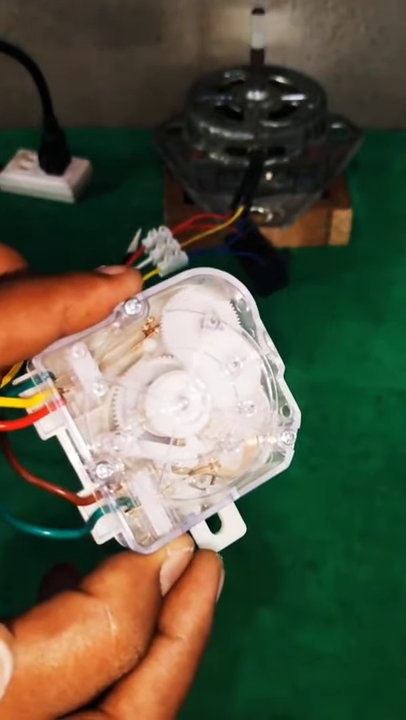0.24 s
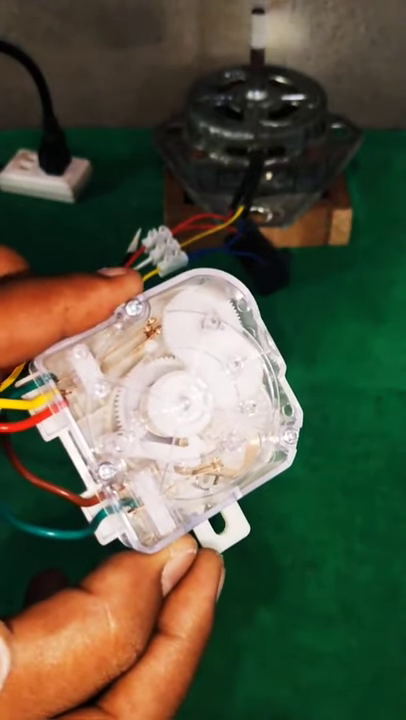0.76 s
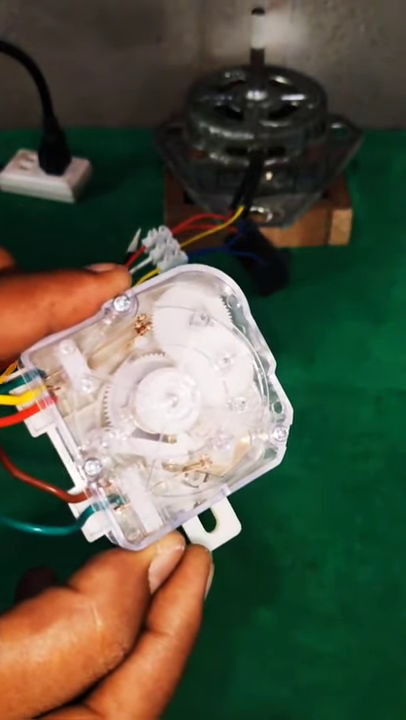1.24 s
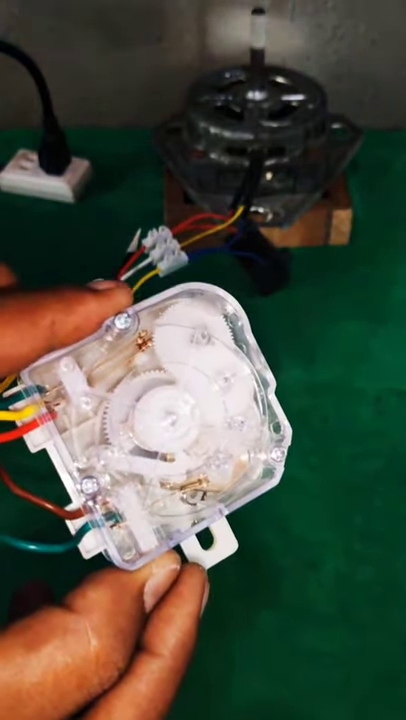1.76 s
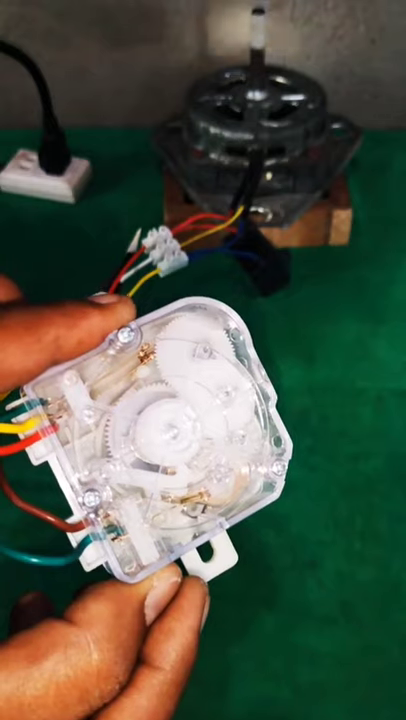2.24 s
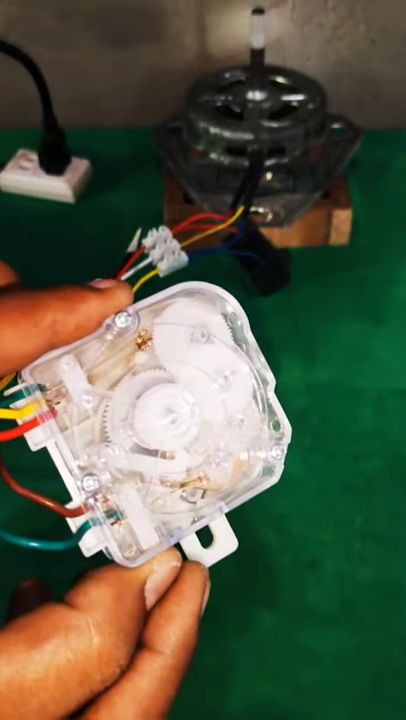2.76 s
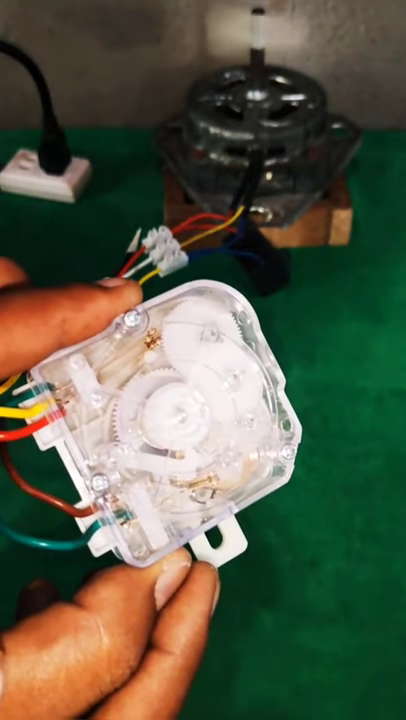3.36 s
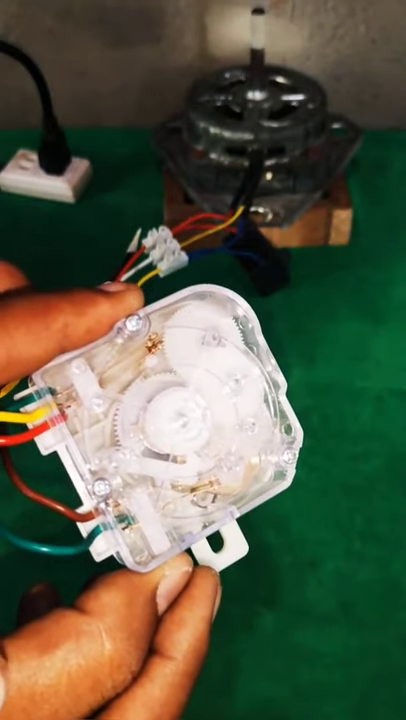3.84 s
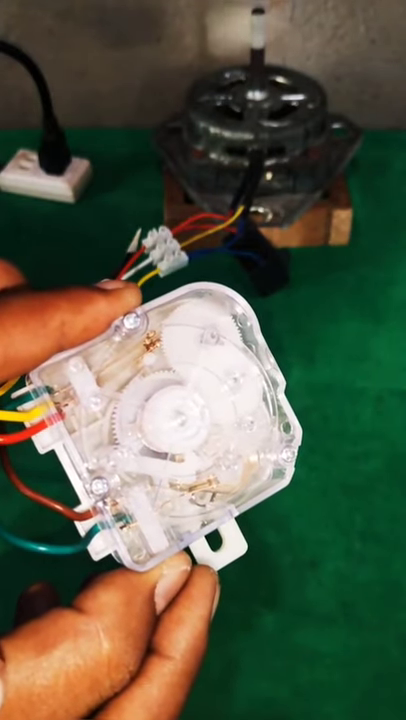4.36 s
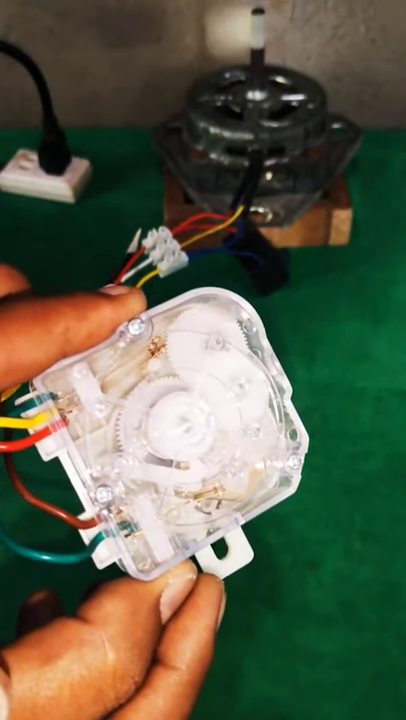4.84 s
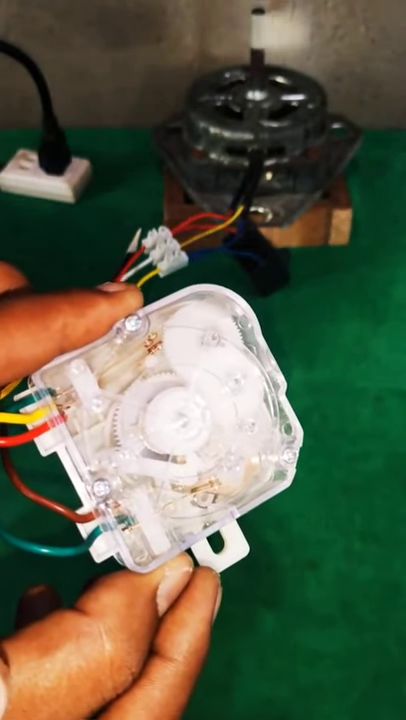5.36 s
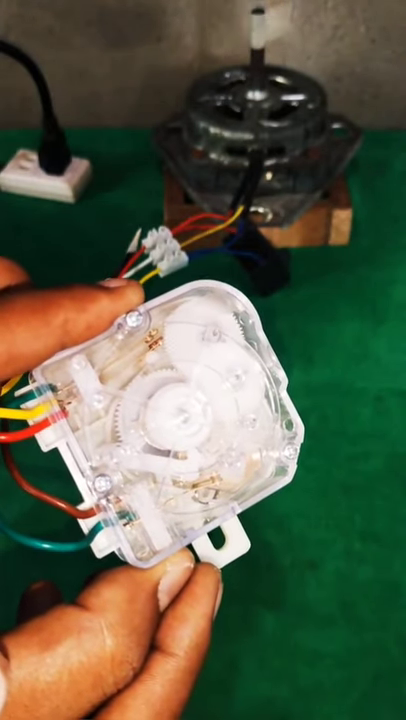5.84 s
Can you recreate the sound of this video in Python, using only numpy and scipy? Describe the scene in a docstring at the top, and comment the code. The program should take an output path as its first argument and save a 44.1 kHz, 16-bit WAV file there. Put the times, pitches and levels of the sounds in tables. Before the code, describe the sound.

A bare electric motor hums loudly with a periodic loose knocking, then the power cuts and it coasts with rattling bursts on its block.

```python
"""A bare washing-machine induction motor runs on a wooden block on a bench: mains hum, rolling bearings,
and a loose knock once per turn that comes and goes with the slow beat between rotor and field.
A clockwork timer ticks throughout; it cuts the power at 4.826 s and the hum stops within a fraction of a second.
The motor then coasts, rocking and rattling on its block in short bursts while the bench drones.
Hum, whirr and drone are sines, rolling and air shaped noise, knocks and ticks clicks ringing modes."""
import sys
import numpy as np
from scipy import signal
from scipy.fft import rfft, irfft, next_fast_len
from scipy.io import wavfile
from scipy.ndimage import map_coordinates

SR = 44100
rng = np.random.default_rng(int(sys.argv[2]) if len(sys.argv) > 2 else 0)


def file_out(sig):
    """Save sig as 16-bit WAV at sys.argv[1]."""
    # one column per channel
    cols = np.atleast_2d(sig).T
    # limit, then scale
    lim = np.clip(cols, -1, 1)
    pcm = np.round(lim * 32767).astype(np.int16)
    wavfile.write(sys.argv[1], SR, pcm)


N = 268524
TIME = np.arange(N) / SR

MAINS_HZ, SHAFT_HZ = 59.895, 29.377
POWER_OFF_S = 4.826
BEAT_S, BEAT_PEAK_S = 0.4345, 0.17   # beat between rotor and field; a moment of greatest load
KNOCK_AT_S = 0.166   # first hard knock
ROCK_HZ = 206.7   # bounce rate on the block
KNOCK_ROOM_T60_S = 0.15

# rolling of the coasting motor: t/s, level/dB re powered run
COAST = [(4.84, 1), (4.92, -8.5), (5.02, -11), (5.36, -12), (5.5, -5), (5.8, -8), (6.09, -6)]
# bursts of rocking while coasting: start/s, length/s, rattle peak/dB, swell rms/dB (nominal levels)
BURSTS = [(4.875, .012, -48, -42), (4.968, .008, -38, -39), (5.066, 0.0035, -38, -39.5),
          (5.124, 0.029, -33, -36.5), (5.408, 0.015, -40.5, -42.5), (5.439, .004, -38, -46),
          (5.4567, 0.0094, -30.5, -38), (5.509, 0.02, -33.5, -40.5), (5.559, 0.021, -31.5, -36),
          (5.623, 0.0035, -31.5, -45), (5.663, 0.022, -29.5, -36), (5.713, .004, -38.5, -42),
          (5.7342, .008, -30.5, -48), (5.856, .028, -35.5, -42), (5.924, 0.026, -34, -38),
          (5.988, 0.019, -31.5, -44), (6.078, 0.01, -33.5, -40)]


def from_db(db):
    """Decibels to gain."""
    return 10 ** (np.asarray(db) / 20)


def rms_one(x):
    """Scale to unit rms."""
    return x / np.sqrt(np.mean(x ** 2) + 1e-20)


def in_time(rows):
    """Each column of a curve, interpolated at every sample."""
    s, *columns = np.transpose(rows)
    return [np.interp(TIME, s, c) for c in columns]


def coloured(x, spectrum):
    """Shape a signal by gains (f/Hz, level/dB), falling 20 dB per octave outside them; rms 1."""
    hz, db = np.transpose(spectrum)
    size = next_fast_len(N + SR // 4)
    bins_hz = np.maximum(np.arange(size // 2 + 1) * SR / size, 1)
    outside_octaves = np.abs(np.log2(bins_hz / np.clip(bins_hz, hz[0], hz[-1])))
    gain = from_db(np.interp(np.log(bins_hz), np.log(hz), db) - 20 * outside_octaves)
    return rms_one(irfft(rfft(x, size) * gain, size)[:N])


def drift(rate_hz):
    """Slow chance: straight lines between random knots of spread 1."""
    knots = rng.standard_normal(1024)
    return np.interp(TIME * rate_hz, np.arange(len(knots)), knots)


def decay(t_s, t60_s):
    """Exponential fall of 60 dB in t60."""
    return np.exp(-np.log(1000) * t_s / t60_s)


def ring(clicks, hz, t60_s):
    """A two-pole resonator: a unit click starts a decaying sine of height 1."""
    r, w = decay(1 / SR, t60_s), 2 * np.pi * hz / SR
    return signal.lfilter([0, np.sin(w)], [1, -2 * r * np.cos(w), r * r], clicks + 1e-18)


def click_train(rows):
    """One click per row (t/s, level/dB)."""
    s, db = np.transpose(rows)
    clicks = np.zeros(N)
    clicks[np.clip((s * SR).astype(int), 0, N - 1)] = from_db(db)
    return clicks


def strikes(rows, modes, scatter_db):
    """Each contact (t/s, level/dB) rings every mode (f/Hz, level/dB, t60/s) with a strength of its own."""
    hz, db, t60_s = np.transpose(modes)[:, :, None]
    t = TIME[:SR // 10]
    signs = (-1) ** np.arange(len(modes))[:, None]
    rings = signs * from_db(db) * decay(t, t60_s) * np.sin(2 * np.pi * hz * t)
    hits = from_db(scatter_db * rng.standard_normal((len(rows), len(modes)))) @ rings
    out = np.zeros(N + SR)
    for (s, level_db), hit in zip(rows, hits):
        start = max(int(s * SR), 0)
        out[start:start + len(t)] += from_db(level_db) * hit
    return out[:N]


def contact(clicks, edge_hz):
    """A blunt contact pushes for a fraction of a millisecond, which dulls the click: a low-pass."""
    return signal.sosfilt(signal.butter(2, min(edge_hz, 0.45 * SR), fs=SR, output="sos"), clicks)


def room(x, wet_db, t60_s):
    """Dense reflections of a small workshop, a decaying noise tail, follow the direct sound."""
    t = TIME[:SR // 2]
    tail = rng.standard_normal(len(t)) * decay(t, t60_s) * (t > 0.004)
    tail = tail / np.sqrt(np.sum(tail ** 2))
    return x + from_db(wet_db) * signal.fftconvolve(x, tail)[:N]


def rotor_time(spin_down_s):
    """Seconds of full-speed turning done so far; friction slows the rotor once the power is off."""
    speed = np.exp(-np.maximum(TIME - POWER_OFF_S, 0) / spin_down_s)
    return np.cumsum(speed) / SR


def power(fade_s):
    """One while the current flows, then an exponential decay."""
    return np.exp(-np.maximum(TIME - POWER_OFF_S, 0) / fade_s)


def rolling_force(turned_s, fresh, grain_db, throb, throb_at_s):
    """Rolling grain repeats with every beat, plus fresh noise; the load swings once per turn."""
    count = int(BEAT_S * SR)
    pits = rng.standard_normal(count) * from_db(grain_db * drift(400)[:count])
    repeating = map_coordinates(rms_one(pits), [turned_s * SR % count], order=3, mode="wrap")
    load = 1 + throb * np.cos(2 * np.pi * SHAFT_HZ * (turned_s - throb_at_s))
    return (repeating + fresh * rng.standard_normal(N)) * load


def room_air():
    """Steady noise of the room air."""
    # spectrum: f/Hz, density/dB (relative)
    spectrum = [(30, 14), (120, 27), (250, 28.5), (500, 20.5), (1500, 9), (4000, 3.5), (7000, -2),
                (13000, -2.5), (15000, -6), (16000, 0.5)]
    return from_db(-65.0) * coloured(rng.standard_normal(N), spectrum)


def snaps(t60_s):
    """A few crisp snaps of decaying band-passed noise, the last ones as the power is cut."""
    # snaps: t/s, click height/dB (before filtering)
    snap_rows = [(0.167, -41), (4.811, -51), (4.840, -53)]
    t = TIME[:SR // 20]
    crack = rng.standard_normal(len(t)) * decay(t, t60_s)
    crack = signal.sosfilt(signal.butter(2, [2200, 7000], "band", fs=SR, output="sos"), crack)
    return contact(np.convolve(click_train(snap_rows), crack)[:N], edge_hz=3400)


def timer(tick_db, tock_db):
    """The clockwork escapement ticks fast and a little unevenly, tick stronger than tock, in its case."""
    # modes of the plastic case: f/Hz, level/dB, t60/s
    case_modes = [(3200, -6, 0.0078), (3095, -1, 0.013), (3530, -8.5, 0.019), (4070, -12, 0.024),
                  (4580, -17.5, 0.014), (5360, -24.5, 0.007)]
    ticks_per_s = 36.4
    index = np.arange(int(N / SR * ticks_per_s))
    s = (index + 0.5 + 0.05 * rng.standard_normal(len(index))) / ticks_per_s
    rows = np.column_stack([s, tick_db + tock_db * (index % 2)])
    case = strikes(rows, case_modes, scatter_db=5.5)
    return room(contact(case, edge_hz=5500), wet_db=-6.0, t60_s=0.032)


def bench(turned_s):
    """The bench top rumbles under power, thuds now and then and drones during the coast."""
    # rumble spectrum: f/Hz, density/dB (relative)
    rumble_spectrum = [(20, -27), (40, -17), (55, -8), (68, 1.5), (84, -1.5), (100, -8.5), (130, -10.5),
                       (180, -38)]
    # drone under the coasting motor: t/s, f/Hz, rms/dB (before its drift)
    drone_curve = [(4.8, 69.3, -69.5), (4.86, 68.5, -39), (4.94, 72.6, -59), (5.45, 76.35, -55),
                   (5.54, 77.6, -43.5), (5.68, 83, -48), (5.735, 80, -34), (5.79, 77.5, -51),
                   (6.09, 72.4, -48.5)]
    # thuds: t/s, f/Hz, peak/dB (before the high-pass)
    thud_rows = [(0.179, 80.3, -24.5), (1.59, 77, -27.5), (2.02, 79, -34.5), (3.878, 78.3, -27.5),
                 (4.811, 79.5, -30), (5.11, 137, -39)]
    force = rolling_force(turned_s, fresh=1.1, grain_db=1.0, throb=0.091, throb_at_s=0.034)
    rumble = from_db(-43.5) * coloured(force, rumble_spectrum) * power(fade_s=0.065)
    hz, db = in_time(drone_curve)
    drone = np.sqrt(2) * from_db(db + 1.5 * drift(25)) * np.sin(2 * np.pi * np.cumsum(hz) / SR)
    thuds = sum(ring(click_train([(s, peak_db)]), pitch_hz, t60_s=0.3)
                for s, pitch_hz, peak_db in thud_rows)
    thuds = signal.sosfilt(signal.butter(2, 50, "high", fs=SR, output="sos"), thuds)
    return rumble + drone + thuds


def rotor_tones(turned_s, waver_db):
    """The rotor's tones swell in turn through each beat, so the whirr seems to wander up and down."""
    # tones: f/Hz at full speed, rms/dB mid-swell, swell peak/s after the greatest load
    tone_rows = [(324.4, -61, 0.2), (386, -65, 0.023), (565, -61, .161), (591, -63.5, 0.052),
                 (657.5, -61, .366), (712.6, -62.5, 0.03), (764.2, -63.5, 0.2), (1233, -63, 0.028)]
    depth_db = 5
    tones = 0
    for hz, db, swell_s in tone_rows:
        swell_db = depth_db * np.cos(2 * np.pi * (turned_s - BEAT_PEAK_S - swell_s) / BEAT_S)
        gain = from_db(db + swell_db + waver_db * drift(4.8))
        tones = tones + gain * np.sin(2 * np.pi * (hz * turned_s + rng.random()))
    return np.sqrt(2) * tones * power(fade_s=0.063)


def bearing_load(turned_s, wander_db):
    """Bearing load in dB: it swells as the rotor slips past the poles and jumps at the first hard knock."""
    # load swing: multiple of the beat rate, swing/dB
    swings = [(1, 0.44), (2, 0.53), (4, 0.72)]
    jolt_db, settle_s = 3, 0.11
    beat_phase = 2 * np.pi * (turned_s - BEAT_PEAK_S) / BEAT_S
    swing_db = sum(db * np.cos(k * beat_phase) for k, db in swings)
    since_knock_s = TIME - KNOCK_AT_S
    jolt = jolt_db * np.exp(-np.abs(since_knock_s) / settle_s) * (since_knock_s > 0)
    return (swing_db + jolt + wander_db * drift(8.3)) * power(fade_s=0.03)


def bearings(turned_s):
    """Rolling shakes the frame, rings the end shield and hisses in the races."""
    # spectrum of the frame: f/Hz, density/dB (relative)
    frame_spectrum = [(110, -12), (150, 3.5), (200, -7.5), (300, 1), (370, -10.5), (490, -11), (580, -4.5),
                      (760, -2.5), (880, -10.5), (960, -2), (1030, -12.5), (1300, -10), (1500, -26.5)]
    # spectrum of the end shield: f/Hz, density/dB (relative)
    shield_spectrum = [(950, -31), (1060, -6), (1130, 5), (1220, 3), (1320, -9.5), (1450, -14.5),
                       (1650, -4.5), (1900, -13.5), (2300, -15.5), (2600, -26.5), (3200, -54)]
    # spectrum of the races: f/Hz, density/dB (relative)
    race_spectrum = [(1300, -20.5), (1700, 1), (2300, -1), (2530, -10.5), (2700, -2.5), (2900, -6.5),
                     (3080, -0.5), (3300, -16.5), (3900, -19), (4500, -25), (5200, -33.5), (9000, -40.5),
                     (12000, -50.5)]
    # narrow ring of the races, pulsing with each turn: f/Hz, density/dB (relative)
    ring_spectrum = [(2450, -29.5), (2630, -7), (2702, 2.5), (2790, -5.5), (2950, -28)]
    coast_db, = in_time(COAST)
    load_db = bearing_load(turned_s, wander_db=0.1)

    force = rolling_force(turned_s, fresh=0.32, grain_db=1.5, throb=0.26, throb_at_s=0.03)
    frame = from_db(-48 + 0.5 * load_db) * coloured(force, frame_spectrum)

    # the end shield answers load more steeply than the frame
    force = rolling_force(turned_s, fresh=0.6, grain_db=1.5, throb=0.31, throb_at_s=0.03)
    shield = from_db(-51 + 1.9 * load_db) * coloured(force, shield_spectrum)

    force = rolling_force(turned_s, fresh=1.0, grain_db=3.0, throb=0.2, throb_at_s=0.029)
    races = from_db(-57.0 + 0.8 * coast_db + 0.85 * load_db) * coloured(force, race_spectrum)

    force = rolling_force(turned_s, fresh=0.99, grain_db=0.5, throb=0.92, throb_at_s=0.02)
    race_ring = from_db(-65.5 + 1.3 * coast_db) * coloured(force, ring_spectrum)
    return (frame + shield) * from_db(coast_db) + races + race_ring


def hum(waver_db):
    """The field squeezes the stator twice per mains cycle: wavering sines at multiples of that rate."""
    # harmonics: multiple of twice the mains frequency, rms/dB (before the waver)
    harmonics = [(1, -26.5), (2, -48), (3, -58.5), (5, -61), (6, -63), (7, -58), (8, -66.5), (9, -71),
                 (10, -62.5)]
    tones = 0
    for k, db in harmonics:
        gain = from_db(db + waver_db * np.sqrt(k) * drift(9))
        tones = tones + gain * np.sin(2 * np.pi * (2 * k * MAINS_HZ * TIME + rng.random()))
    return np.sqrt(2) * tones * power(fade_s=0.023)


def spell(from_peak_s):
    """Strength 0 to 1 of a knocking spell: builds over a few turns, breaks off, returns every beat."""
    rise_s, fall_s = 0.06, 0.028
    off_s = (from_peak_s + BEAT_S / 2) % BEAT_S - BEAT_S / 2
    return np.exp(-(off_s / np.where(off_s < 0, rise_s, fall_s)) ** 2)


def turn_knocks(scatter_db, stray_s):
    """Rows (t/s, level/dB): a knock per powered turn, strong and weak spell per beat; hard ones replace."""
    # turns on which the rotor knocks hard: t/s, level/dB
    hard_knocks = [(.166, -24.5), (0.1981, -31), (.8073, -32.5), (1.016, -32.5), (1.05, -27.5),
                   (1.4588, -30), (2.3435, -26), (2.7524, -30.5), (2.7871, -31), (2.9866, -30.5),
                   (3.6384, -30), (4.5232, -29.5), (4.840, -30.5)]
    spell_db, half_spell_db, lull_db = -34.5, -43, -51   # beat peak, half-way between peaks, lulls
    s = np.arange(KNOCK_AT_S % (1 / SHAFT_HZ), POWER_OFF_S, 1 / SHAFT_HZ)
    strong = from_db(spell_db) * spell(s - BEAT_PEAK_S)
    weak = from_db(half_spell_db) * spell(s - BEAT_PEAK_S - BEAT_S / 2)
    db = 20 * np.log10(strong + weak + from_db(lull_db))
    rows = np.column_stack([s, db]) + rng.standard_normal((len(s), 2)) * [stray_s, scatter_db]
    nearest_hard_s = np.abs(s[:, None] - np.array(hard_knocks)[:, 0]).min(axis=1)
    return np.vstack([rows[nearest_hard_s > 0.5 / SHAFT_HZ], hard_knocks])


def rocking(rough, waver_rad):
    """The coasting motor bounces unevenly on its feet, one swell per burst, over a low wobble."""
    # wobble spectrum: f/Hz, density/dB (relative)
    wobble_spectrum = [(60, -4.5), (90, 0.5), (125, -3), (170, -3.5), (215, 1.5), (255, 6), (310, -14.5),
                       (420, -8.5), (520, -20)]
    spread_s = 0.013   # added to half the burst length
    bounce = np.sin(2 * np.pi * ROCK_HZ * TIME + waver_rad * drift(45))
    swells = 0
    for start_s, length_s, _, db in BURSTS:
        from_middle_s = TIME - start_s - length_s / 2
        swells = swells + from_db(db) * np.exp(-(from_middle_s / (length_s / 2 + spread_s)) ** 2)
    wobble = from_db(-51.0) * coloured(rng.standard_normal(N), wobble_spectrum)
    wobble = wobble * (1 - power(fade_s=0.027))
    return np.sqrt(2) * swells * bounce * (1 + rough * drift(130)) + wobble


def burst_contacts(glancing_db, stray_s):
    """Rows (t/s, level/dB): a landing per bounce in each burst, square at first, then glancing."""
    rows = []
    for start_s, length_s, db, _ in BURSTS:
        early_late, glance = rng.random(size=(2, 16))
        after_s = np.arange(1, len(glance) + 1) / ROCK_HZ
        landing_s = start_s + after_s + stray_s * (2 * early_late - 1)
        bounces = np.column_stack([landing_s, db - glancing_db * glance ** 2])
        rows += [(start_s, db), *bounces[after_s < length_s]]
    return rows


def stray_contacts(follows, scatter_db):
    """Rows (t/s, level/dB): light stray touches, stronger when the coasting motor rolls harder."""
    from_s, per_s, level_db = 4.92, 36, -36   # level: upper limit at 0 dB rolling
    count = int(per_s * (N / SR - from_s))
    early_late, softer = rng.random(size=(256, 2))[:count].T
    s = from_s + (np.arange(count) + early_late) / per_s
    coast_db = np.interp(s, *np.transpose(COAST))
    return list(np.column_stack([s, level_db + follows * coast_db - scatter_db * softer]))


def housing_contacts():
    """Knocks under power and rattle and landings in the coast ring the modes of the motor housing."""
    # modes of the housing: f/Hz, level/dB, t60/s
    modes = [(320.5, -23, 0.11), (422, -25.5, 0.097), (568.5, -24.5, 0.083), (635, -23, 0.06),
             (765, -21.5, 0.043), (933, -15, 0.019), (1134, -16.5, 0.033), (1304, -19.5, 0.077),
             (1785, -3.5, 0.021), (1945, 0, 0.012), (2145, -7.5, .013), (2480, -16.5, 0.026),
             (2886, -26.5, 0.04), (3640, -29, 0.025), (4540, -35, 0.031), (5540, -41, 0.029),
             (6600, -42, 0.012)]
    rows = turn_knocks(scatter_db=3.2, stray_s=0.00045)
    knocks = contact(strikes(rows, modes, scatter_db=2.4), edge_hz=4000)
    knocks = room(knocks, wet_db=-8.5, t60_s=KNOCK_ROOM_T60_S)

    rows = burst_contacts(glancing_db=6, stray_s=0.001) + stray_contacts(follows=1.34, scatter_db=6)
    rattle = contact(strikes(rows, modes, scatter_db=3.0), edge_hz=3600)
    rattle = room(rattle, wet_db=-7, t60_s=KNOCK_ROOM_T60_S)

    # landing on the block is softer and heavier: body below the housing's main ring
    landing = contact(strikes(rows, modes, scatter_db=3.0), edge_hz=1180)
    landing = from_db(0.5) * room(landing, wet_db=4.5, t60_s=KNOCK_ROOM_T60_S)
    return knocks + rattle + landing


def scene():
    """Room air, snaps, timer, bench and motor at one microphone."""
    turned_s = rotor_time(spin_down_s=5.0)
    background = room_air() + snaps(t60_s=0.023) + timer(tick_db=-56.5, tock_db=-4.0) + bench(turned_s)
    running = rotor_tones(turned_s, waver_db=1.0) + bearings(turned_s) + hum(waver_db=0.48)
    loose = rocking(rough=0.36, waver_rad=1.0) + housing_contacts()
    return (background + running + loose)[None]


def record(dry):
    """A steep low-pass cuts the top at 15.5 kHz."""
    return signal.sosfilt(signal.ellip(10, 0.1, 80, 15500, fs=SR, output="sos"), dry)


dry = scene()
out = record(dry)
file_out(out)
```